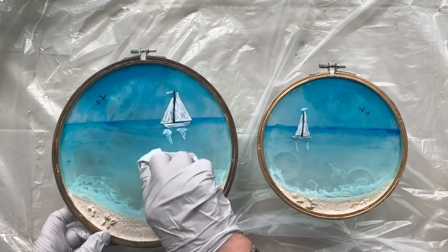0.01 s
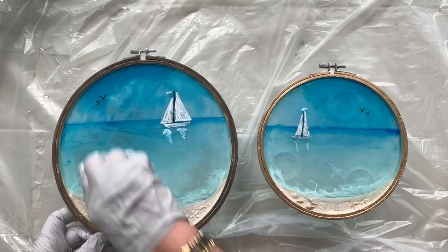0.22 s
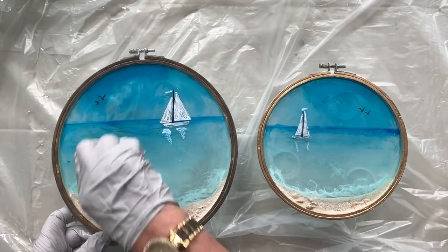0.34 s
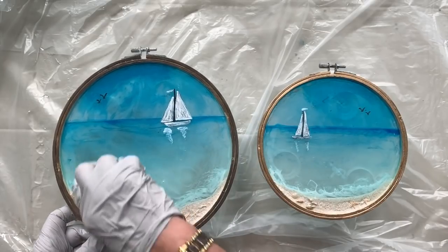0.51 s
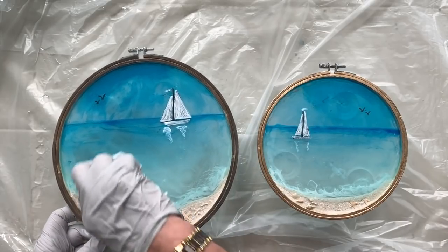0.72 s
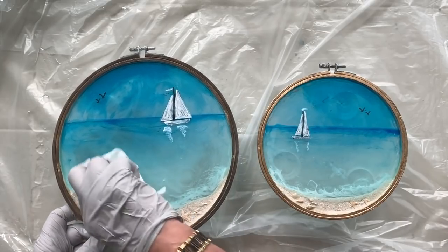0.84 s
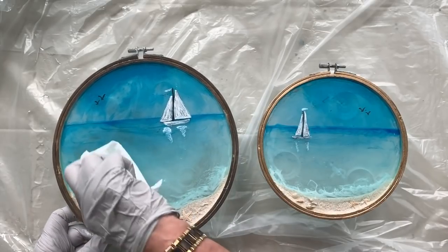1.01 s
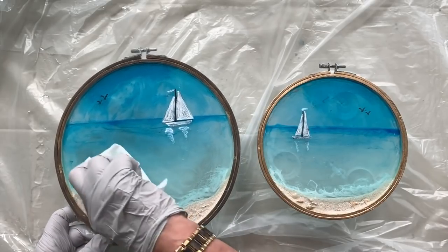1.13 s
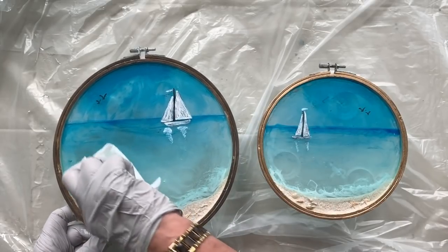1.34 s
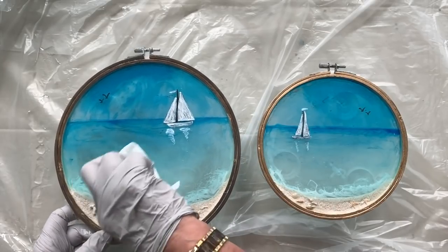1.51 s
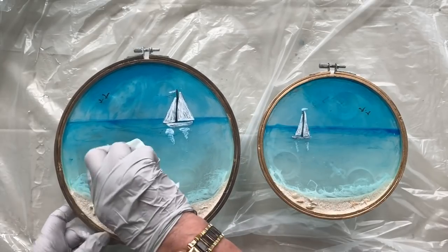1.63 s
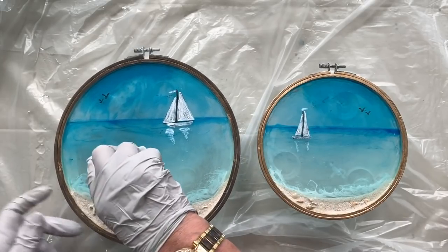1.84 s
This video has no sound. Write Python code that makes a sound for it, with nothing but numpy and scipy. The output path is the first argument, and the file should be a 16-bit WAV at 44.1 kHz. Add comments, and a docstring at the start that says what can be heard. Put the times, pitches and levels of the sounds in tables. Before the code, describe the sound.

A gloved hand rubs a cloth over a resin disc, lightly at first, then harder with grainy friction, hollow hoop knocks and low table booms, ending in a faint plastic crackle; close stereo microphone, quiet room.

```python
"""A gloved hand scrubs a resin disc in a wooden hoop with a cloth; the hoop lies on a plastic sheet on a table.
First come snaps, faint swishes, light knocks and a faint rising squeak: swelling tones, gated noise, a swept sine.
From about 0.45 s the scrub is harder: grainy friction noise, hiss and swishes, while the hoop rocks and knocks
(swelling tones, ringing modes) and each push booms in the table top (decaying sines). At 1.62 s the other hand
slides over the sheet: crackling noise and snaps. A close two-port microphone hears it."""
import sys
import numpy as np
from scipy import signal
from scipy.fft import rfft, irfft, next_fast_len
from scipy.io import wavfile

SR = 44100
rng = np.random.default_rng(int(sys.argv[2]) if len(sys.argv) > 2 else 0)


def log_audio(samples):
    """Write samples as a 16-bit WAV file to the path given in sys.argv[1]."""
    # one column per channel
    frames = np.atleast_2d(samples).T
    # limit to full scale, then quantise
    limited = np.clip(frames, -1, 1)
    pcm = np.round(limited * 32767).astype(np.int16)
    wavfile.write(sys.argv[1], SR, pcm)


def ratio(d):
    """dB to gain"""
    e = np.asarray(d, float) / 20
    return 10 ** e


N = 81585


def at_hz(points, hz):
    """Reads a spectrum table on a log frequency axis."""
    table_hz, value = np.transpose(points)
    return np.interp(np.log(hz + 1), np.log(table_hz), value)


def shaped(x, points):
    """Colours a noise by a spectrum table; rms 1."""
    gain = ratio(at_hz(points, np.fft.rfftfreq(N, 1 / SR)))
    y = irfft(rfft(x) * gain, N)
    return y / np.std(y)


def ring(press, hz, t60_s):
    """Two-pole resonator: a unit click sets off a decaying sine of height 1."""
    r = ratio(-60 / (t60_s * SR))
    w = 2 * np.pi * hz / SR
    return signal.lfilter([0, np.sin(w)], [1, -2 * r * np.cos(w), r * r], press + 1e-18)


def clicks(start_s, sizes):
    """One impulse per event."""
    out = np.zeros(N)
    np.add.at(out, (np.asarray(start_s) * SR).astype(int), sizes)
    return out


def contact(x, length_s):
    """Spreads each impulse into a short rough press."""
    shape = np.hanning(int(length_s * SR))
    press = signal.fftconvolve(x, shape / shape.sum())[:N]
    return press * rng.standard_normal(N) * np.sqrt(len(shape))


def swell(hz, length_s):
    """A tone whose envelope grows to 1 and dies, some 76 dB down after length_s."""
    seconds = np.arange(int(length_s * SR * 2)) / SR
    t = seconds * np.log(1000) / length_s * 1.756
    return (t * np.exp(1 - t)) ** 1.02 * np.sin(2 * np.pi * hz * seconds)


def swells(start_s, peak_db, pitch_hz, length_s):
    """One swelling tone per event."""
    out = np.zeros(N + SR)
    for s, db, hz in zip(start_s, peak_db, pitch_hz):
        tone = swell(hz, length_s)
        first = int(s * SR)
        out[first:first + len(tone)] += ratio(db) * tone
    return out[:N]


def gate(start_s, length_s, attack_s, t60_s):
    """Linear attack, hold to length_s, exponential release."""
    t = np.arange(N) / SR - start_s
    return np.clip(t / attack_s, 0, 1) * ratio(-60 * np.clip(t - length_s, 0, 1) / t60_s)


def grains(per_s, spread_db):
    """Random impulses of uneven size and either sign."""
    hit = rng.random(N) < per_s / SR
    size = ratio(spread_db * np.minimum(rng.exponential(1, N), 4))
    return hit * size * rng.choice([-1, 1], N)


def room():
    """Steady low room noise."""
    # room tone: (frequency [Hz], relative level [dB])
    room_spectrum = [(30, -10), (60, 8.5), (100, 1), (200, -13.5), (500, -39), (1500, -50), (5000, -41)]
    rms_db = -50
    return ratio(rms_db) * shaped(rng.standard_normal(N), room_spectrum)


def sheet():
    """A glove slides over thin plastic: crackling noise of uneven level, and snaps of sheet and glove."""
    # snaps: (time [s], peak level [dB], pitch [Hz])
    snaps = [(0.0141, -24, 11450), (0.017, -35, 8070), (0.596, -34, 10300), (.759, -29, 10400),
             (0.762, -31.5, 5280), (1.695, -36.5, 7300), (1.733, -32, 7300), (1.7665, -35, 11400),
             (1.7925, -39, 12600)]
    # sliding noise: (frequency [Hz], relative level [dB])
    slide_spectrum = [(400, -6), (900, -4.5), (2300, 9.5), (3500, 2.5), (4700, 9), (7000, 5), (10000, 8.5),
                      (12500, 0.5), (14500, -4), (16000, -25)]
    slide_s, slide_length_s, slide_db = 1.62, 0.17, -44.5
    snap_length_s, grains_per_s, flutter_rms_db = .005, 800, 1.6
    slide = shaped(rng.standard_normal(N) + 0.34 * grains(grains_per_s, 3.2), slide_spectrum)
    flutter = ratio(flutter_rms_db * shaped(rng.standard_normal(N), [(40, 0), (200, -40)]))
    slide = slide * flutter * ratio(slide_db) * gate(slide_s, slide_length_s, .02, .15)
    return swells(*np.transpose(snaps), snap_length_s) + slide


def squeak():
    """Faint breathy tone as the cloth grips: a slowly rising sine of wavering level."""
    start_s, length_s, level_db = .365, .28, -61
    start_hz, rise_hz_per_s = 1275, 750
    t = np.arange(N) / SR - start_s
    wobble = shaped(rng.standard_normal(N), [(40, 0), (200, -30)])
    tone = np.sin(2 * np.pi * (start_hz + rise_hz_per_s * t / 2) * t)
    return ratio(level_db) * gate(start_s, length_s, 0.022, 0.25) * (1 + wobble / 2) * tone


def rasp(friction_db):
    """Wide rasp of the cloth: grains independent left and right, following the friction."""
    # rasp: (frequency [Hz], relative level [dB])
    rasp_spectrum = [(1200, -4.5), (2000, -7.5), (3800, -9.5), (5000, -27)]
    against_friction_db = -5
    sides = np.array([shaped(grains(2500, 3), rasp_spectrum) for side in "LR"])
    return sides * ratio(friction_db + against_friction_db)


def cloth(friction_db, hiss_db):
    """Grainy fluttering friction in the disc, a hiss that follows the scrub, and short swishes as the cloth turns."""
    # friction in the disc: (frequency [Hz], relative level [dB])
    disc_spectrum = [(290, -53.5), (500, -5), (927, -6.5), (1410, 1.5), (2060, -9), (4000, -38.5),
                     (5200, -60)]
    # hiss of the cloth: (frequency [Hz], relative level [dB])
    hiss_spectrum = [(1200, 13), (2500, -4.5), (4600, 6), (6500, 5), (9000, 5.5), (12000, 3.5), (13800, -7),
                     (15200, -31)]
    # swishes: (time [s], length [s], level before tilt [dB], tilt: gain above 6 kHz and cut below [dB])
    swishes = [(.005, 0.16, -68, 5.5), (0.268, 0.067, -57.5, -3.5), (0.45, 0.0024, -38, -2.5),
               (0.5152, 0.01, -39, -4), (0.661, 0.015, -45.5, 0), (0.758, 0.0091, -54, 3.5),
               (0.812, 0.048, -50, -4.5), (0.906, 0.025, -58, 8), (1.01, 0.017, -35.5, 0),
               (1.074, 0.015, -35, -2.5), (1.141, 0.025, -50.5, -5.5), (1.413, 0.079, -49, -3.5)]
    flutter_rms_db = 3.5
    rise_share, tail_share, shortest_tail_s = .4, 1.2, .012   # shares of the swish length
    rub = shaped(grains(1200, 0.63), disc_spectrum)
    flutter_db = flutter_rms_db * shaped(rng.standard_normal(N), [(30, 12.0), (120, -44)])
    hiss = shaped(rng.standard_normal(N) + 0.11 * grains(7600, 1.8), hiss_spectrum)
    low = signal.sosfilt(signal.butter(2, 6000, fs=SR, output="sos"), hiss)
    high = hiss - low
    out = rub * ratio(friction_db + flutter_db) + hiss * ratio(hiss_db)
    for s, length_s, db, tilt_db in swishes:
        envelope = gate(s, length_s, rise_share * length_s, tail_share * length_s + shortest_tail_s)
        out += envelope * ratio(db) * (low * ratio(-tilt_db) + high * ratio(tilt_db))
    return out


def table(drag_db):
    """Pushes ring the modes of the top, sharp ones favour the higher; each damps the ring before; the hoop drags."""
    # pushes: (middle of the press [s], level [dB], sharpness about 100 Hz [dB per octave])
    pushes = [(0.026, -40, 8), (0.077, -37, 14.5), (0.216, -24, -1), (0.311, -22.5, -0.5),
              (0.51, -21.5, 5.5), (0.544, -25, 13.5), (0.617, -21, 6), (0.682, -22.5, 3.5),
              (0.716, -22, 5.5), (0.802, -19, 10), (0.855, -14, 5), (0.88, -18, -3.5), (0.923, -17.5, 7.5),
              (0.944, -14.5, 10.5), (0.986, -23.5, 8), (1.047, -31, 7.5), (1.121, -25, 4), (1.196, -15, 12),
              (1.236, -15.5, 4.5), (1.259, -17.5, 1.5), (1.294, -14.5, 1.5), (1.33, -18.5, 6),
              (1.361, -24, 12.5), (1.432, -33, -11), (1.49, -18.5, 10), (1.52, -15.5, 2), (1.552, -25, 7.5)]
    # modes of the table top: (nominal frequency [Hz], relative level [dB], t60 [s])
    top_modes = [(60.4, -0.5, 0.14), (103.9, 1, 0.26), (119, -19.5, 0.11), (164.2, -15, 0.12),
                 (252, -14.5, 0.04), (336, -23.5, 0.03)]
    # dragging noise: (frequency [Hz], relative level [dB])
    drag_spectrum = [(60, -27), (100, -3.5), (250, -3.5), (500, -7.5), (800, -8.5), (1500, -56)]
    push_s = .02
    detune, spread_db = .045, 2   # rms; the load on the top shifts its modes
    s, db, sharp = np.transpose(pushes)
    mode_hz, mode_db, t60_s = np.transpose(top_modes)[:, :, None]
    chance = rng.normal(0, 1, (len(s), 2, len(top_modes)))
    phase = rng.uniform(0, 2 * np.pi, (len(s), len(top_modes)))
    out = shaped(grains(1500, 3.05), drag_spectrum) * ratio(drag_db)
    starts = s - push_s / 2
    stops = [*s[1:] + push_s / 2, N / SR]   # crossfades into the next push
    for k, (start, stop) in enumerate(zip(starts, stops)):
        first, last = int(start * SR), int(stop * SR)
        t = np.arange(last - first) / SR
        fade = np.sin(np.pi / 2 * np.clip(np.minimum(t, stop - start - t) / push_s, 0, 1)) ** 2
        level_db = db[k] + mode_db + sharp[k] * np.log2(mode_hz / 100) + spread_db * chance[k, 0, :, None]
        decay_db = -60 * np.maximum(t - push_s / 2, 0) / t60_s
        hz = mode_hz * (1 + detune * chance[k, 1, :, None])
        tones = ratio(level_db + decay_db) * np.sin(2 * np.pi * hz * t + phase[k, :, None])
        out[first:last] += fade * np.sum(tones, axis=0)
    return out


def knocks(friction_db):
    """Each knock swells in the hollow under the disc and rings the hoop; scrubbing adds a random rattle."""
    # hoop on table: (time [s], swell peak [dB], hoop press against swell [dB], pitch of the hollow [Hz])
    knock_events = [(0.185, -25.5, -14, 846), (0.202, -28.5, 4, 936), (0.238, -40, -5, 900),
                    (0.281, -42, 2, 906), (0.452, -33.5, 8, 800), (0.484, -18.5, -8, 906),
                    (0.498, -28, 8, 920), (0.532, -11.5, -17, 860), (0.564, -22, -20, 886),
                    (0.603, -29.5, 8, 920), (0.634, -24.5, -1.5, 905), (0.651, -27, -13, 880),
                    (0.664, -23.5, -7, 885), (0.688, -20.5, -0.5, 838), (0.699, -24.5, 0, 990),
                    (0.763, -23.5, -8, 834), (0.787, -16.5, -2.5, 894), (0.794, -20.5, 5.5, 940),
                    (0.838, -25, 11, 990), (0.852, -14.5, -6, 900), (0.859, -17.5, -3.5, 860),
                    (0.916, -8.5, -8, 899), (0.919, -8, 6, 873), (0.95, -20, 3.5, 867),
                    (0.96, -24.5, -7, 836), (1.023, -25, 10, 830), (1.038, -25, -4, 845),
                    (1.081, -27, 7.5, 905), (1.149, -18, -13, 906), (1.182, -13, -9.5, 860),
                    (1.19, -19, 5.5, 897), (1.203, -29, 1.5, 864), (1.224, -11, 0, 925),
                    (1.282, -23.5, 18, 884), (1.287, -7, -8.5, 902), (1.328, -23, -0.5, 930),
                    (1.336, -15.5, 4.5, 952), (1.478, -19.5, 2, 845), (1.495, -23, 1, 943),
                    (1.528, -31.5, -8, 870)]
    # hoop modes: (frequency [Hz], level [dB], t60 [s])
    hoop_modes = [(509, -14, 0.026), (1174, -16.5, 0.03), (1455, -21.5, 0.029), (1692, -21, 0.019),
                  (2324, -39.5, 0.06), (4550, -26, 0.0041)]
    # rattle pitches: (frequency [Hz])
    rattle_hz = [800, 900, 1020, 1150]
    swell_s, contact_s = 0.019, 0.0048
    rattle_per_s, rattle_db, rattle_spread_db = 200, 5.5, 2   # level against the friction
    s, db, bright_db, hollow_hz = np.transpose(knock_events)
    hollow = swells(s, db, hollow_hz, swell_s)
    press = contact(clicks(s, ratio(db + bright_db)), contact_s)
    hoop = sum(ratio(level_db) * ring(press, hz, t60_s) for hz, level_db, t60_s in hoop_modes)
    hits = grains(rattle_per_s, rattle_spread_db) * ratio(friction_db + rattle_db)
    dealt = rng.integers(0, len(rattle_hz), N)   # pitch of each hit
    rattle = sum(signal.fftconvolve(hits * (dealt == k), swell(hz, swell_s))[:N]
                 for k, hz in enumerate(rattle_hz))
    return hollow + hoop + rattle


def stereo(x):
    """One sound goes to left and right with a phase and level offset, plus short echoes of each side's own."""
    # stereo phase: (frequency [Hz], left lead [half turns]); flat near whole half turns in the treble
    stereo_phase = [(0, 0), (900, -.1), (1600, .03), (4500, .7), (5100, 1.2), (6500, 1.97), (7800, 2.03),
                    (9100, 2.97), (10300, 3.03), (11700, 3.97), (13100, 4.03), (14200, 4.98), (22050, 5)]
    # balance of ports: (frequency [Hz], left minus right [dB])
    port_balance = [(30, -1), (100, -2.2), (1000, -2.5), (2500, -4.5), (5000, -1), (7000, 0)]
    echo_db, echo_t60_s, echo_band_hz = -11.5, .06, [250, 5500]   # level before the band filter
    size = next_fast_len(N + SR // 2)
    hz = np.fft.rfftfreq(size, 1 / SR)
    turn = np.exp(.5j * np.pi * np.interp(hz, *np.transpose(stereo_phase)))
    half = ratio(at_hz(port_balance, hz) / 2) * turn   # half the offset to each side
    t = np.arange(SR // 4) / SR
    tail = rng.standard_normal((2, len(t))) * ratio(-60 * t / echo_t60_s) * (t > .003)
    tail = tail / np.sqrt(np.sum(tail[0] ** 2))
    tail = signal.sosfilt(signal.butter(2, echo_band_hz, "band", fs=SR, output="sos"), tail)
    response = np.array([half, 1 / half]) + ratio(echo_db) * rfft(tail, size)
    return irfft(rfft(x, size) * response, size)[:, :N]


def scene():
    """All sources at the microphone; the rasp alone bypasses the shared port path."""
    # scrub: (time [s], friction in the disc [dB], hiss of the cloth [dB], drag on the table [dB])
    scrub = [(0, -79, -60.5, -77), (0.066, -73, -58, -42.5), (0.136, -86, -111, -68),
             (0.206, -60.5, -74.5, -42.5), (.3, -67.5, -58.5, -59.5), (.36, -70.5, -76, -61),
             (.44, -66, -66, -82), (0.481, -51, -56, -40), (.7, -48, -59, -40), (.95, -46, -64.5, -41),
             (1.1, -53.5, -51, -42.5), (1.248, -49, -60, -29.5), (1.419, -49, -62, -46),
             (1.496, -56.5, -71, -37.5), (1.6, -63.5, -65, -56), (1.85, -66.5, -72, -79)]
    s, *levels = np.transpose(scrub)
    friction_db, hiss_db, drag_db = (np.interp(np.arange(N) / SR, s, level) for level in levels)
    mono = room() + sheet() + squeak() + cloth(friction_db, hiss_db) + table(drag_db) + knocks(friction_db)
    return rasp(friction_db) + stereo(mono)


def roll_off(x):
    """The treble ends steeply here."""
    return signal.sosfilt(signal.butter(12, 14850, fs=SR, output="sos"), x)


def record(dry):
    """The microphone cuts the deep bass below 42 Hz."""
    mix = signal.sosfilt(signal.butter(4, 42, "high", fs=SR, output="sos"), dry)
    return roll_off(mix)


dry = scene()
out = record(dry)
log_audio(out)
```